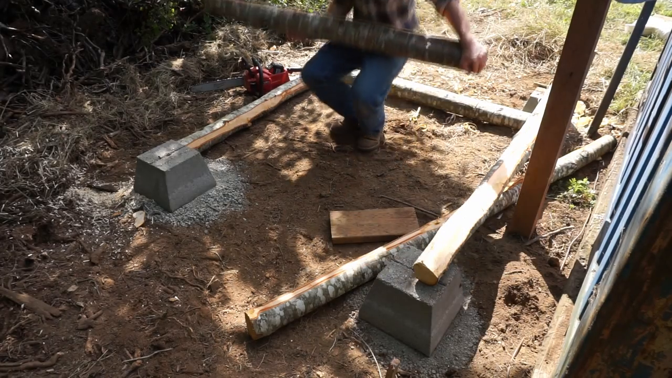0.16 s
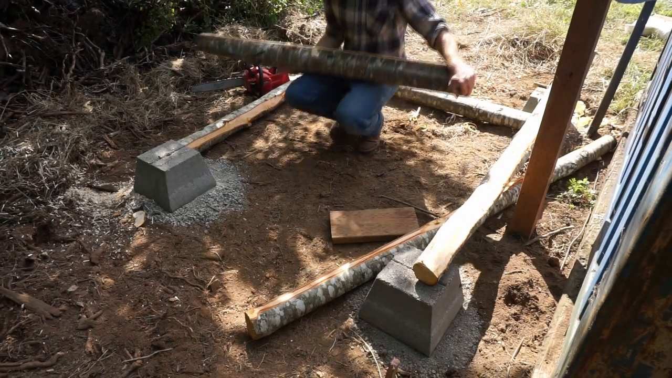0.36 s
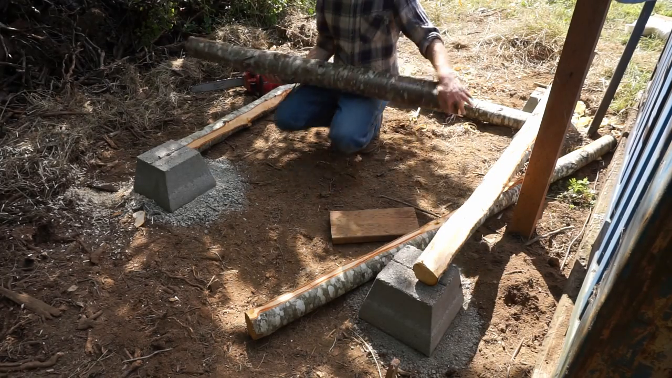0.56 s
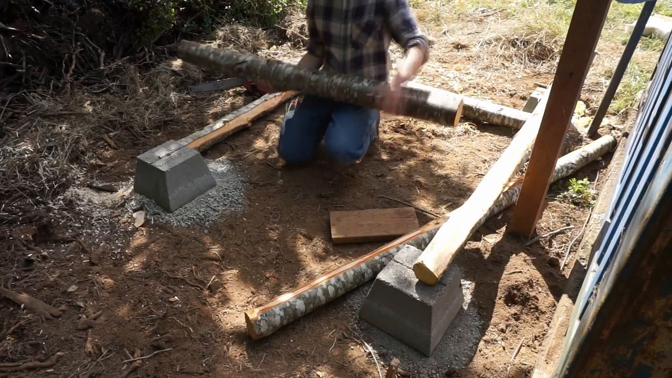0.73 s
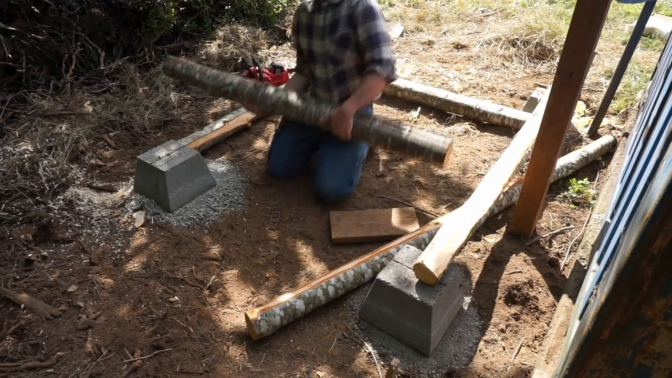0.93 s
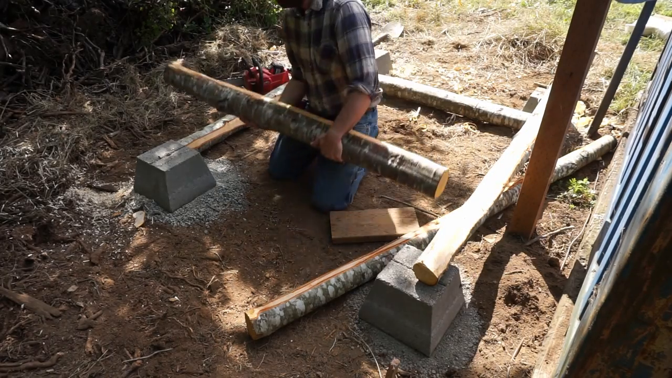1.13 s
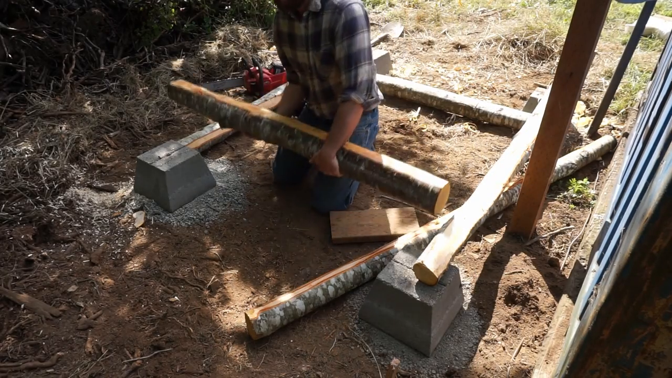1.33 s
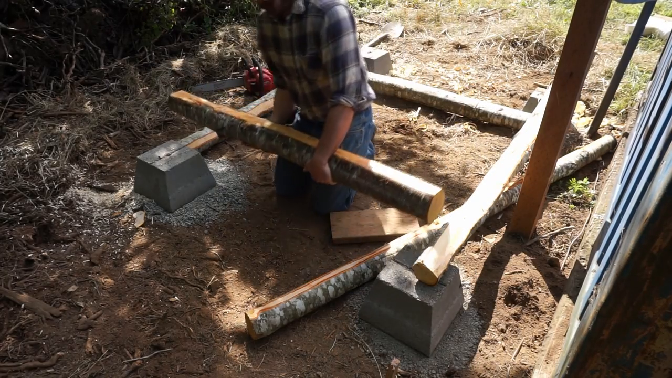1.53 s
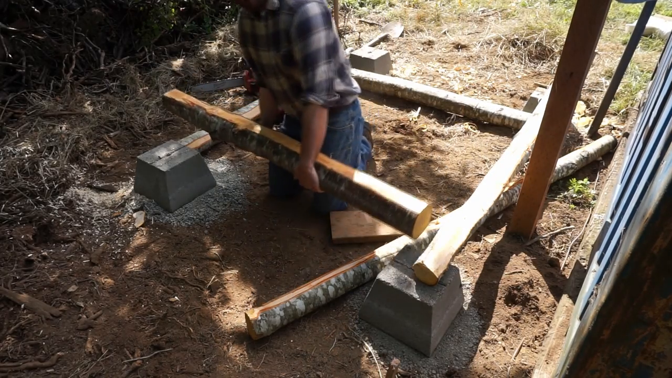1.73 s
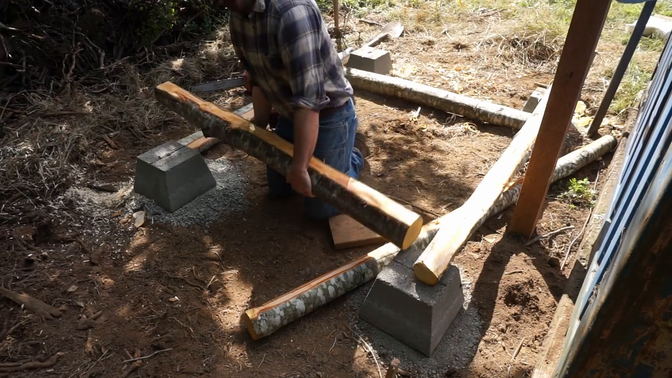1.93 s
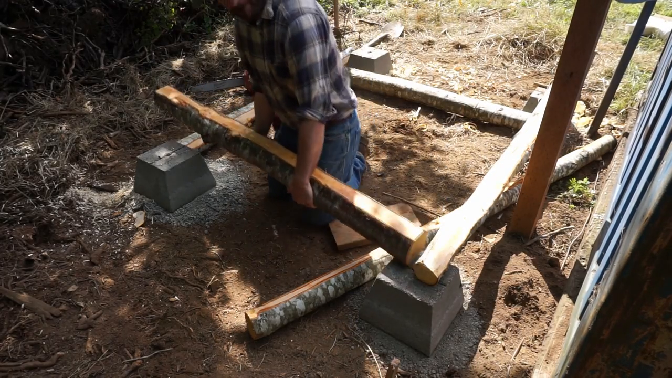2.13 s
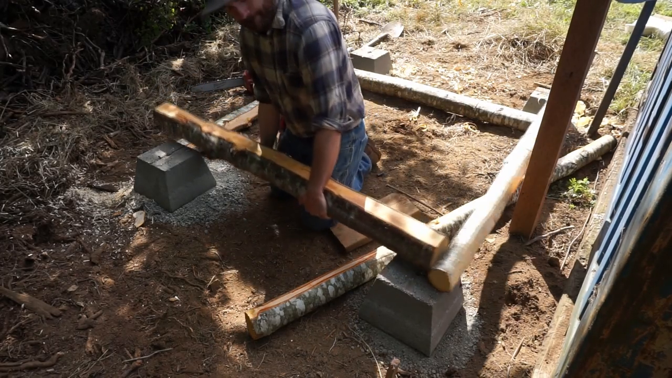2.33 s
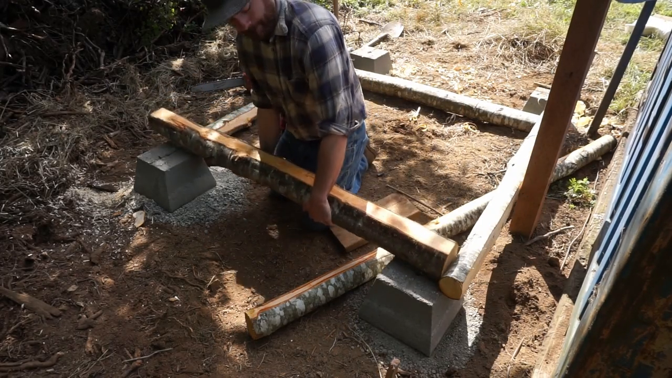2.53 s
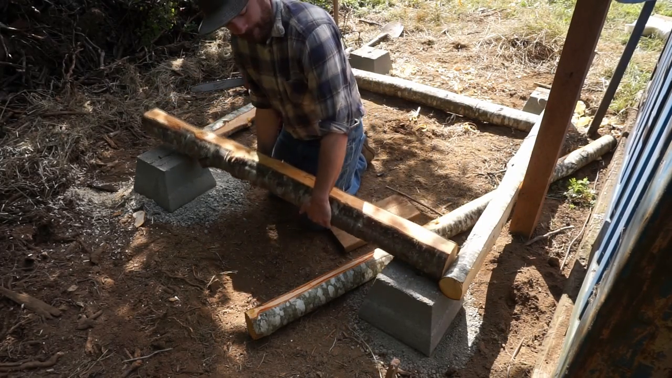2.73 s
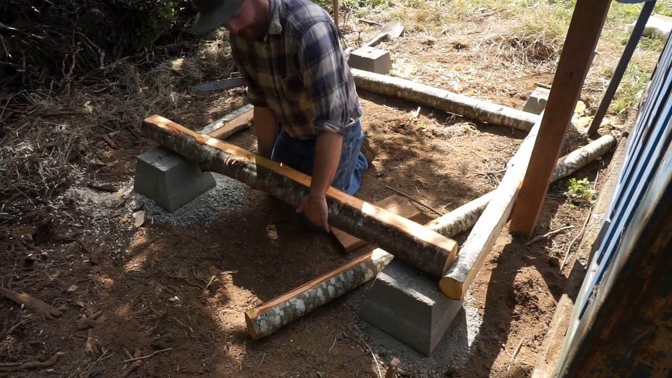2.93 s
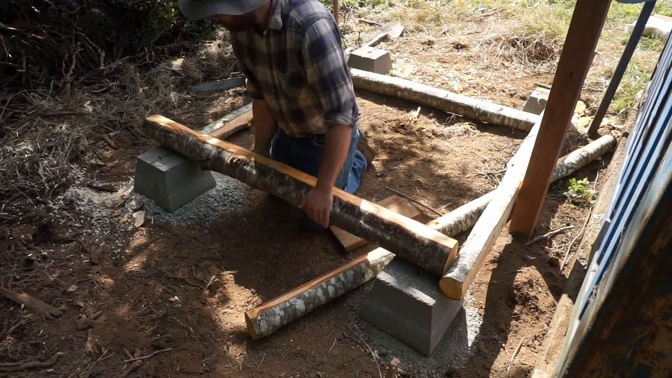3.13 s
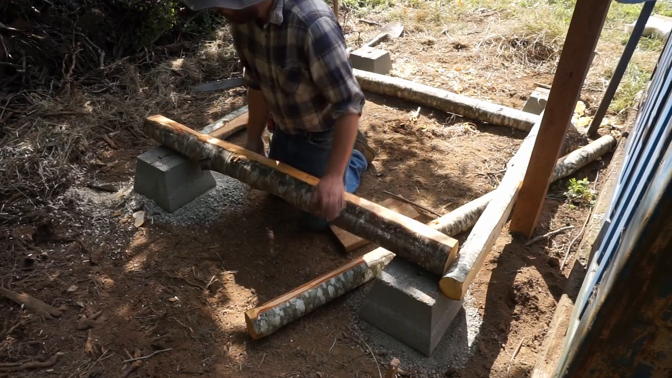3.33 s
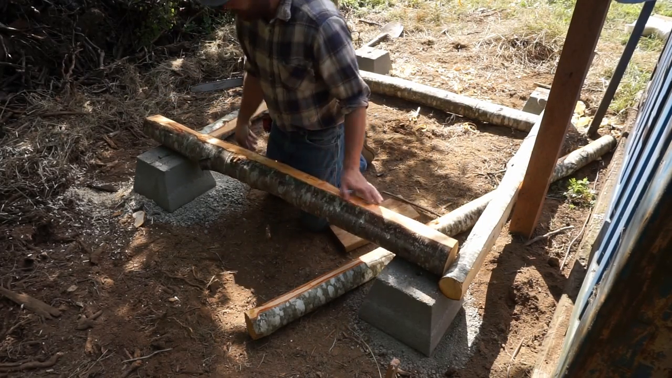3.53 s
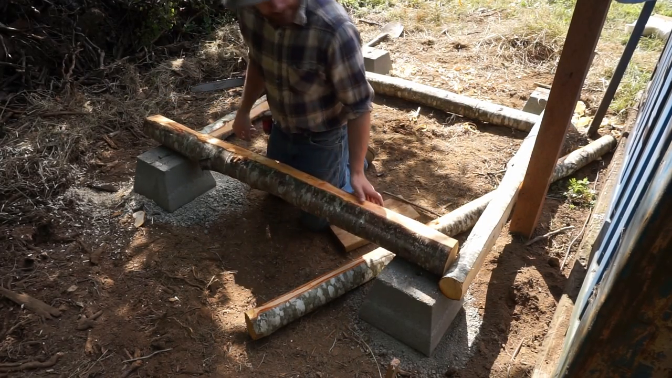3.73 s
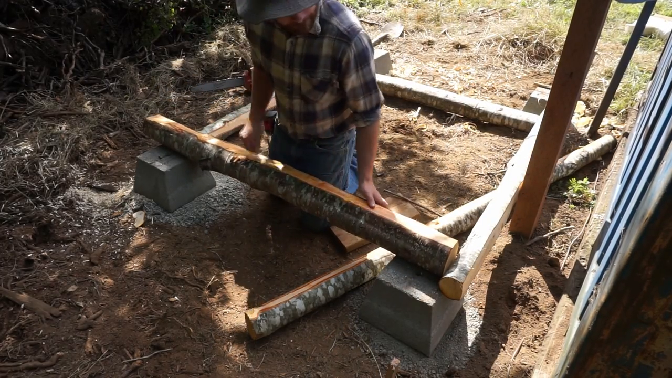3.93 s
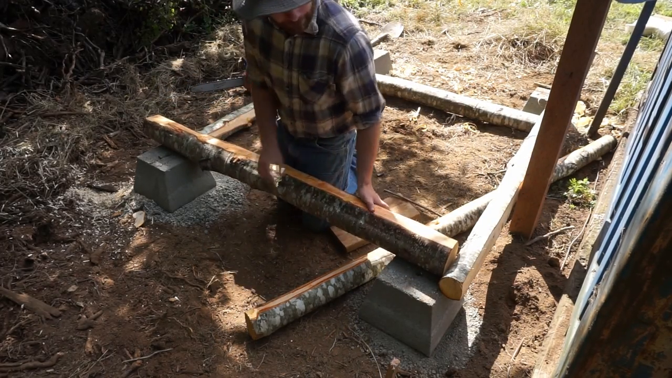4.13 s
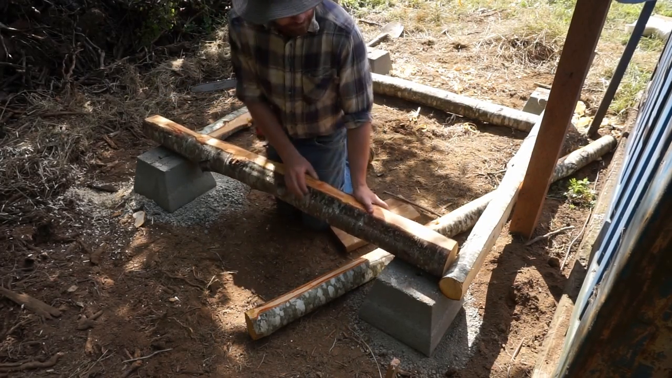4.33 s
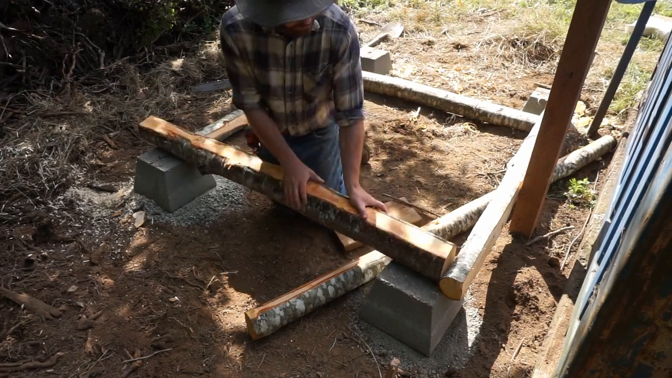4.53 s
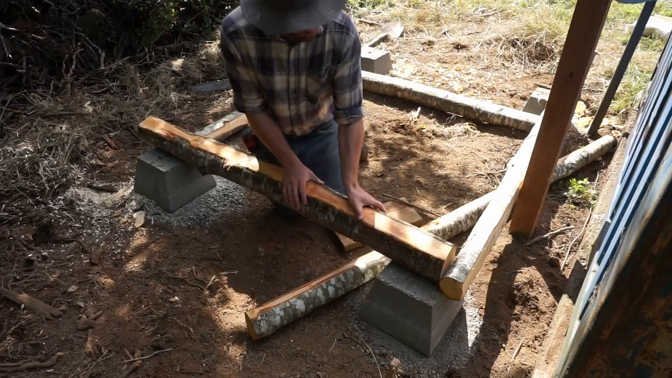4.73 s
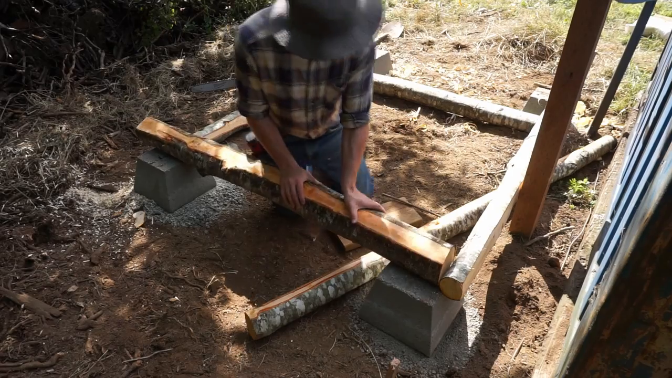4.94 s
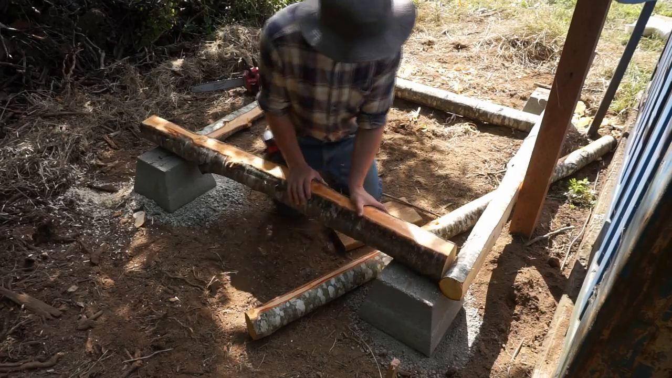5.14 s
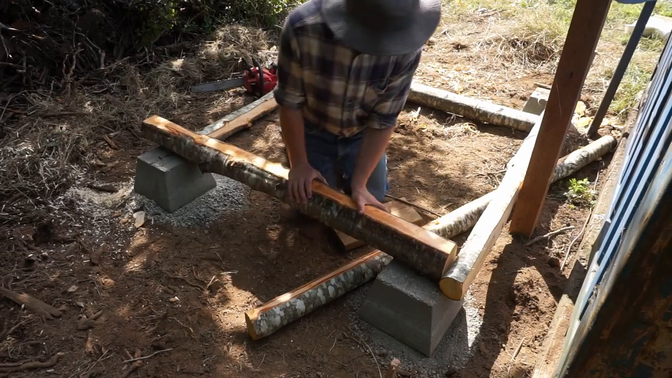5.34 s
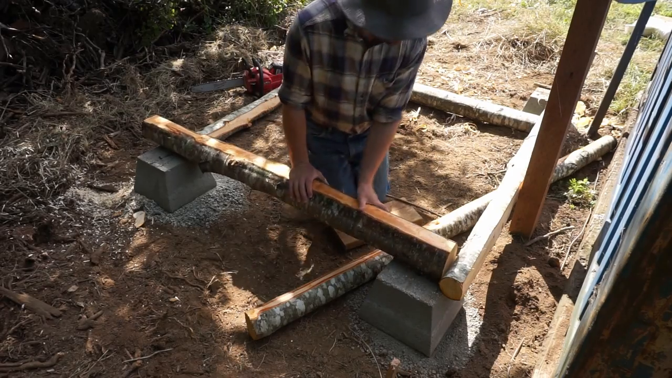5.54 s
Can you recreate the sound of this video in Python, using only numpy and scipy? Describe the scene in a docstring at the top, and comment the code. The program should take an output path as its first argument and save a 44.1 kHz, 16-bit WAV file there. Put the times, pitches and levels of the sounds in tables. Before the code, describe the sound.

Dry twigs crack underfoot and clothes rustle, then a heavy log knocks, scrapes onto concrete and thuds into place outdoors.

```python
"""Over a distant rush of air, a man steps on cracking dry twigs close to a stereo microphone.
He kneels; clothes and dry litter rustle as filtered noise, and boots and knees thump on soft soil.
He sets a heavy log down: it knocks, slides along a second log, grinds onto a concrete block
and drops into its seat with a thud. Wood and concrete are damped modes; scrapes are grainy noise."""
import sys
import numpy as np
from scipy import signal
from scipy.fft import rfft, irfft, next_fast_len
from scipy.io import wavfile

SR = 44100
rng = np.random.default_rng(int(sys.argv[2]) if len(sys.argv) > 2 else 0)


def wav_out(sig):
    """Save sig, one row per channel (or a flat mono array), as 16-bit PCM at SR to the path in sys.argv[1]."""
    wavfile.write(sys.argv[1], SR, np.round(np.clip(np.atleast_2d(sig).T, -1, 1) * 32767).astype(np.int16))


N = 246078
TOP_HZ = 16000  # upper band limit
RING_T = np.arange(SR // 2) / SR  # time axis of one struck sound, in seconds
LEFT_RIGHT = np.array([[-.5], [.5]])  # shares out a left-right difference

# The log's contacts: [t/s, strength/dB, hardness/dB, what it meets]
LOG_CONTACTS = [(2.1701, -28.5, 10, "seat"), (2.242, -29, 16, "log"), (2.259, -19.5, 1, "log"),
                (2.2661, -21.5, 2.5, "seat"), (2.2894, -22, -9, "log"), (2.2947, -18.5, -4, "log"),
                (2.3107, -26.5, -4, "log"), (2.474, -36.5, 13, "block"), (2.4839, -14, 2, "block"),
                (2.4904, -17, 3, "block"), (2.5026, -22, 11.5, "block"), (2.536, -23.5, 3, "block"),
                (2.5947, -34.5, 15, "log"), (2.608, -38, 5, "seat"), (2.622, -36.5, -6, "seat"),
                (2.8423, -27.5, 0.5, "seat"), (2.8442, -19.5, -2.5, "seat")]
# Modes of the log: [f/Hz, level/dB, t60/s]
LOG_MODES = [(364.6, 1.5, 0.33), (632, -1.5, 0.17), (669, -0.5, 0.19), (971, 2, 0.093), (1206, -1.5, 0.084),
             (1544, -6, 0.095), (2560, -2, 0.035), (3070, -10, 0.049), (3350, -15, 0.055), (4350, -22, .06)]
# Left-right likeness of diffuse sound: [f/Hz, correlation]
DIFFUSE_LIKENESS = [(60, 0.31), (300, 0.83), (800, 0.49), (2000, 0.11), (8000, 0.19)]
# Left-right likeness of sound close to the microphone: [f/Hz, correlation]
CLOSE_LIKENESS = [(200, 1), (800, 0.99), (2500, 0.44), (6000, 0.041), (12000, -0.57)]


def amp(db):
    """Decibels to gain."""
    return 10 ** (np.asarray(db) / 20)


def unit(x):
    """Scale to rms 1."""
    return x / np.sqrt(np.mean(x ** 2) + 1e-20)


def along(points, hz):
    """(Hz, value) points read on a log frequency axis."""
    f, v = np.transpose(points)
    return np.interp(np.log(hz + 1), np.log(f + 1), v)


def curves(rows):
    """One value per sample for each column after the time."""
    s, *cols = np.transpose(rows)
    return [np.interp(np.arange(N) / SR, s, c) for c in cols]


def filtered(x, response):
    """Multiply the spectrum of x by a response of frequency."""
    n = x.shape[-1]
    m = next_fast_len(n + 8192)
    return irfft(rfft(x, m) * response(np.fft.rfftfreq(m, 1 / SR)), m)[..., :n]


def noise(spectrum, likeness, grain_db=0, size=N):
    """Stereo noise of rms 1, clumped into half-millisecond grains of random strength."""
    white = rng.standard_normal
    grains = np.repeat(amp(grain_db * white(size // 20 + 1)), 20)[:size]

    def mid_side(hz):
        # this split of mid and side gives the wanted left-right correlation
        turn = np.arccos(np.clip(along(likeness, hz), -1, 1)) / 2
        return amp(along(spectrum, hz)) * [np.cos(turn), np.sin(turn)]

    mid, side = filtered(white((2, size)) * grains, mid_side)
    return unit(np.array([mid + side, mid - side]))


def fade(t60, t=RING_T):
    """A decay that has lost 60 dB after t60 seconds."""
    return np.exp(-np.log(1000) * t / np.maximum(t60, 1e-3))


def ring(modes, tilt_db=0, right_db=0, scatter_db=3.5):
    """Damped modes of alternating sign at new strengths for each blow; high ones lean more to one side."""
    out = np.zeros((2, len(RING_T)))
    for k, (hz, db, t60) in enumerate(modes):
        octaves_up = np.log2(hz / modes[0][0])
        level = db + tilt_db * octaves_up + scatter_db * rng.standard_normal()
        lean = right_db * min(hz / 1500, 1) * LEFT_RIGHT
        out += (-1) ** k * amp(level + lean) * np.sin(2 * np.pi * hz * RING_T) * fade(t60)
    return out


def add(track, s, sound):
    """Mix a sound into the track at time s."""
    part = track[:, max(round(s * SR), 0):][:, :sound.shape[1]]
    part += sound[:, :part.shape[1]]


def swell(s, rise_s, fall_s):
    """A gain that peaks at time s and is a tenth of that rise_s before and fall_s after."""
    t = np.arange(N) / SR - s
    return np.exp(-np.log(10) * np.minimum(np.maximum(-t / rise_s, t / fall_s), 10))


def overlap(levels_db, swells):
    """The joint gain of unrelated sounds: their powers add."""
    return np.sqrt(amp(levels_db) ** 2 @ np.square(swells))


def radiated(x, corner_hz):
    """A small body radiates little below its corner frequency."""
    return signal.sosfilt(signal.butter(2, corner_hz, "highpass", fs=SR, output="sos"), x)


def air():
    """A distant rush of shaped noise, heard lower after the loud knocks, as if the recorder
    turned itself down, then louder again."""
    # Level at which the rush is heard, before a lift of 2 dB: [t/s, level/dB]
    heard_level = [(0, -43), (2.4, -42), (2.65, -46.5), (3.85, -45), (5.05, -40.5), (5.35, -45)]
    # Spectrum of the rush: [f/Hz, level/dB per Hz]
    rush_spectrum = [(30, -45), (80, -34), (140, -27), (200, -19.5), (320, -6.5), (500, -4.5), (750, -0.5),
                     (1150, -4.5), (1350, -10.5), (1750, -14.5), (2300, -19.5), (4400, -23.5), (9000, -25),
                     (16000, -23.5)]
    level_db, = curves(heard_level)
    return amp(level_db + 2) * noise(rush_spectrum, DIFFUSE_LIKENESS, grain_db=1)


def rustle():
    """Boots, knees and hands scuff and the clothes swish: a little all the time, more with each move."""
    # Steady rustle while walking, kneeling, still and shifting: [t/s, swish level/dB]
    steady = [(0, -45.5), (1.05, -44), (1.45, -51), (3.2, -62), (4.2, -56), (5.0, -55.5), (5.45, -72)]
    # Shifts of the man's body: [t/s at the peak, scuff level/dB, swish level/dB, length/s]
    body_moves = [(0.024, -33, -41.5, .14), (0.56, -38, -41, 0.32), (0.652, -44.5, -38.5, .36),
                  (0.8, -43.5, -50, 0.28), (0.961, -31.5, -38, .16), (1.18, -42, -50, 0.52),
                  (1.608, -40, -41, 0.3), (1.898, -45, -39, 0.31), (2.136, -40, -43, 0.091),
                  (2.815, -45, -41.5, 0.26), (3.29, -73, -55, 0.15), (3.895, -49.5, -67, 0.48),
                  (4.25, -49.5, -53, 0.29), (4.484, -46.5, -60, 0.53), (4.57, -52, -44, 0.23),
                  (4.818, -43.5, -45.5, 0.31), (5.045, -44, -50, 0.21), (5.16, -45, -47.5, 0.61)]
    # Spectrum of scuffing on dry litter: [f/Hz, level/dB per Hz]
    scuff_spectrum = [(40, -32), (150, -28), (350, -10.5), (900, 4.5), (1500, 0.5), (2000, 1), (2900, 0),
                      (4200, -8), (8000, -16.5), (16000, -37)]
    # Spectrum of swishing clothes: [f/Hz, level/dB per Hz]
    swish_spectrum = [(1500, -20), (3500, -0.5), (6000, -2), (11000, 2), (16000, -3.5)]
    rise_share = 0.42  # part of a move spent speeding up
    steady_scuff_db = -6.5  # relative to the steady swish

    steady_db, = curves(steady)
    _, scuff_db, swish_db, _ = np.transpose(body_moves)
    moves = [swell(s, rise_share * length, (1 - rise_share) * length) for s, _, _, length in body_moves]
    scuff_gain = np.hypot(amp(steady_db + steady_scuff_db), overlap(scuff_db, moves))
    swish_gain = np.hypot(amp(steady_db), overlap(swish_db, moves))
    scuff = scuff_gain * noise(scuff_spectrum, DIFFUSE_LIKENESS, grain_db=3.0)
    swish = swish_gain * noise(swish_spectrum, DIFFUSE_LIKENESS, grain_db=1.5)
    return scuff + swish + strokes()


def strokes():
    """A sliding weave, sole or bit of bark hisses in a narrow band that swells and fades."""
    # Strokes: [t/s at the peak, level/dB, rise and fall/s each, centre f/Hz, width/octaves]
    hisses = [(0.033, -38.5, .03, 2300, 0.32), (0.575, -40.5, 0.071, 1850, 0.12),
              (.63, -48, 0.086, 3330, 0.29), (0.978, -33, 0.046, 2860, 0.55),
              (1.247, -46.5, 0.16, 2950, 0.55), (1.905, -47, .07, 10400, 0.15),
              (2.368, -25.5, .003, 12600, 0.54), (3.604, -44.5, 0.033, 14000, 0.57),
              (4.564, -52.5, 0.21, 2780, .3), (4.82, -51, 0.09, 2670, 0.28),
              (5.136, -44.5, 0.14, 2050, 0.46), (5.13, -44, 0.039, 13500, 0.49)]
    out = np.zeros((2, N))
    for s, db, length, hz, octaves in hisses:
        envelope = np.hanning(round(2 * length * SR))
        band = [(hz / 8 ** octaves, -50), (hz / 2 ** octaves, -11), (hz, 0),
                (hz * 2 ** octaves, -11), (hz * 8 ** octaves, -50)]
        hiss = noise(band, DIFFUSE_LIKENESS, grain_db=1.5, size=len(envelope))
        add(out, s - length, amp(db) * envelope * hiss)
    return out


def log_hum():
    """Hands shifting on the bark keep the log's lowest mode faintly ringing until it first lands."""
    hum_db, lift_db, lift_t60_s = -50.5, -38, 2.9  # steady level; extra at the start and its decay
    width_hz = 30  # bandwidth of the mode in the hands
    rub_spectrum = [(150, -8.5), (350, -4), (800, 4), (2000, -29)]  # [f/Hz, level/dB per Hz]
    t = np.arange(N) / SR
    mode_hz, _, t60 = LOG_MODES[0]
    landing_s = LOG_CONTACTS[0][0]
    carried = fade(t60, np.maximum(t - landing_s, 0))
    rubbing = np.hypot(amp(hum_db), amp(lift_db) * fade(lift_t60_s, t))

    def resonance(hz):
        return 1j * hz * width_hz / (mode_hz ** 2 - hz ** 2 + 1j * hz * width_hz)

    return carried * rubbing * unit(filtered(noise(rub_spectrum, CLOSE_LIKENESS), resonance))


def snaps():
    """A twig gives way with a bright tick, a few cycles of ring and a dull knock."""
    # Cracks of twigs and grit: [t/s, ring level/dB, f/Hz, t60/s, tick level/dB]
    cracks = [(0.015, -29, 1250, 0.0059, -32), (0.021, -18, 600, 0.025, -29),
              (0.0268, -19, 735, 0.022, -28), (0.346, -31.5, 495, 0.051, -48),
              (0.3994, -13.5, 1015, .017, -29), (0.891, -27, 3210, .016, -36),
              (0.8913, -25.5, 706, .016, -42), (0.9555, -1, 2380, 0.0066, -10.5),
              (0.9602, -22, 2590, 0.048, -40), (2.1687, -32, 3760, .018, -24),
              (5.148, -44, 2120, .015, -23.5), (5.183, -40, 2500, .013, -15)]
    # Modes of a twig: [ratio to its pitch, level/dB, share of its t60]
    twig_modes = [(1.013, 1.5, 0.9), (1.17, 0, 0.91), (1.95, 2, 0.18), (2.3, -2.5, 0.62), (5, 0, 0.12)]
    # Dull body of a snap: [f/Hz, level/dB, t60/s]
    knock_modes = [(490, 2, 0.021), (670, -3.5, 0.0085)]
    # Spectrum of the tick: [f/Hz, level/dB per Hz]
    tick_spectrum = [(200, -7), (1000, 2.5), (3000, -3), (7000, -0.5), (16000, 7)]
    middling_hz = 1020  # thinner twigs ring higher, purer and with less knock
    purer_db = 9  # steepening of the overtone slope, dB per octave for each octave of thinness
    knock_db, knock_loss_db = -3.5, 12.5  # knock against ring, and its loss per octave of thinness

    out = np.zeros((2, N))
    for s, db, hz, t60, tick_db in cracks:
        thinness = max(np.log2(hz / middling_hz), 0)  # octaves
        modes = [(hz * ratio, level, t60 * share)
                 for ratio, level, share in twig_modes if hz * ratio < TOP_HZ]
        stick = radiated(ring(modes, -purer_db * thinness, right_db=-0.5), corner_hz=0.77 * hz)
        knock = amp(knock_db - knock_loss_db * thinness) * ring(knock_modes)
        tick = fade(0.033) * noise(tick_spectrum, CLOSE_LIKENESS, size=len(RING_T))
        tick = tick * amp([[-1], [1]])  # the tick leans right
        add(out, s, amp(db) * (stick + knock) + amp(tick_db) * tick)
    return radiated(out, corner_hz=208)


def footfalls():
    """Soft soil takes the weight of boots and knees with a dull, short thump."""
    # Boots and knees meet the soil: [t/s, level/dB before a cut of 5.5 dB]
    steps = [(0.021, -32), (0.827, -51), (.885, -47), (1.628, -42)]
    # Spectrum of the thump: [f/Hz, level/dB per Hz]
    soil_spectrum = [(25, -12), (70, -9), (200, 4), (400, -2), (900, -29)]
    out = np.zeros((2, N))
    for s, db in steps:
        envelope = fade(0.15) - fade(0.015)  # soft onset
        add(out, s, amp(db - 5.5) * envelope * noise(soil_spectrum, CLOSE_LIKENESS, size=len(RING_T)))
    return out


def log_blows():
    """Each contact rings the log and what it meets; a harder one is brighter, crushes more, thumps less."""
    # Modes of the second log: [f/Hz, level/dB, t60/s]
    second_log_modes = [(167, -18, 0.36), (415.4, -9.5, 0.23), (561, -0.5, 0.16), (618.4, -1, 0.13),
                        (990, -15.5, 0.2), (1226, -9.5, 0.23), (1450, -21, 0.11), (2440, -20.5, 0.055)]
    # Modes of the concrete block: [f/Hz, level/dB, t60/s]
    block_modes = [(274, -10.5, 0.15), (433.5, -10.5, 0.16), (614, -7.5, 0.12), (684, -15, 0.079),
                   (790, -26, 0.078), (1117, -13, 0.061), (1426, -5, 0.037), (1497, -9, 0.076),
                   (1690, 1, 0.037), (1761, 3.5, 0.058), (2210, -11, 0.071), (2810, -31, 0.074),
                   (3040, -20, 0.061), (3500, -13, 0.044), (4397, -11.5, 0.067), (4625, -17, 0.1),
                   (4750, -9, 0.022), (6260, -16, 0.052)]
    # Modes of the dull thud: [f/Hz, level/dB, t60/s]
    thud_modes = [(56, -26, 0.24), (144, -5.5, 0.044), (290, -1.5, 0.02), (480, 0.5, 0.024)]
    # Spectrum of crushed bark: [f/Hz, level/dB per Hz]
    crack_spectrum = [(100, -10), (700, 9), (2500, -7.5), (5000, -6), (8000, -9), (16000, -9)]
    # How a contact shares out its energy: squarely into the seat, glancing along the second log,
    # or biting on the concrete block: [log/dB, second log/dB, block/dB, thud/dB, crack/dB]
    energy_shares = {"seat": (-1, -17, -31, 3, -6.5), "log": (-15, 0.5, -23, -13, -15),
                     "block": (-24, -20, 0, -4, -1)}
    base_tilt_db, tilt_per_hardness = -4.5, 0.45  # log slope, dB per octave; added per dB of hardness

    out = np.zeros((2, N))
    for s, db, hard_db, contact in LOG_CONTACTS:
        log_db, second_db, block_db, thud_db, crack_db = db + np.array(energy_shares[contact])
        tilt_db = base_tilt_db + tilt_per_hardness * hard_db
        log = amp(log_db) * ring(LOG_MODES, tilt_db, right_db=-5.5)
        second_log = amp(second_db) * ring(second_log_modes, right_db=-0.5)
        block = amp(block_db) * ring(block_modes, right_db=10.5)
        crack = fade(0.037) * noise(crack_spectrum, CLOSE_LIKENESS, grain_db=5.5, size=len(RING_T))
        crack = amp(crack_db + hard_db) * crack * amp([[-2.5], [2.5]])  # leans right
        thud = amp(thud_db - hard_db) * ring(thud_modes)
        add(out, s, radiated(log + second_log + block + crack, corner_hz=147) + thud)
    return radiated(out, corner_hz=115)


def log_slide():
    """Around the landings the rough wood judders in a grainy rumble and crushes grit on the concrete."""
    # Skids on bark and concrete, rise and fall to a tenth of the peak:
    # [t/s at the peak, rumble level/dB, grit level/dB, rise/s, fall/s]
    skid_rows = [(2.18, -39, -56, 0.023, 0.088), (2.273, -29, -35.5, 0.095, 0.22),
                 (2.492, -21, -19.5, 0.019, 0.094), (2.614, -34, -38.5, 0.11, 0.11),
                 (2.85, -34.5, -59, 0.015, 0.095)]
    # Spectrum of juddering wood: [f/Hz, level/dB per Hz]
    rumble_spectrum = [(25, -43), (45, -11), (85, -12), (150, -5), (330, 3), (620, 0.5), (800, -4),
                       (1200, -9), (2000, -28), (5000, -22)]
    # Spectrum of crushed grit: [f/Hz, level/dB per Hz]
    grit_spectrum = [(400, -30), (1500, 1.5), (3000, -1.5), (5000, -6.5), (7000, -12.5), (11000, -7),
                     (16000, -19)]
    _, rumble_db, grit_db, _, _ = np.transpose(skid_rows)
    skids = [swell(s, rise_s, fall_s) for s, _, _, rise_s, fall_s in skid_rows]
    rumble = overlap(rumble_db, skids) * noise(rumble_spectrum, CLOSE_LIKENESS, grain_db=4.5)
    grit = overlap(grit_db, skids) * noise(grit_spectrum, CLOSE_LIKENESS, grain_db=3.5)
    return rumble + grit * amp([[-3], [2]])  # the grit leans right


def yard(x):
    """The wall and the bushes scatter a short answer: a decaying noise tail that starts 5 ms late."""
    # Decay of the yard: [f/Hz, t60/s]
    yard_decay = [(150, 0.52), (1500, 0.2), (10000, 0.34)]
    hz, t, z = signal.stft(rng.standard_normal((2, SR // 2)), SR, nperseg=256)
    decaying = z * fade(along(yard_decay, hz)[:, None], t)
    tail = signal.istft(decaying, SR, nperseg=256)[1]
    tail = np.pad(tail / np.linalg.norm(tail[0]), ((0, 0), (SR // 200, 0)))
    return signal.fftconvolve(x, tail, axes=1)[:, :N]


def scene():
    """Sound leads in phase at the left microphone, but most of the band is louder at the right one."""
    # Louder right side: [f/Hz, right over left/dB]
    right_excess = [(100, -1.5), (350, 1.5), (800, 4.5), (2500, 3), (6000, 0), (14000, 2.5)]
    lead = .26  # radians, reached at 200 Hz
    near = log_blows() + log_slide() + log_hum() + snaps() + footfalls()
    mix = near + amp(-20.0) * yard(near) + rustle() + air()

    def microphone_pair(hz):
        level = amp(along(right_excess, hz) * LEFT_RIGHT)
        return level * np.exp(-1j * lead * LEFT_RIGHT * np.minimum(hz / 200, 1))

    return filtered(mix, microphone_pair)


def record(dry):
    """The microphone chain keeps next to nothing above its band limit."""
    return filtered(dry, lambda hz: 1 / (1 + (hz / TOP_HZ) ** 120))


dry = scene()
out = record(dry)
wav_out(out)
```